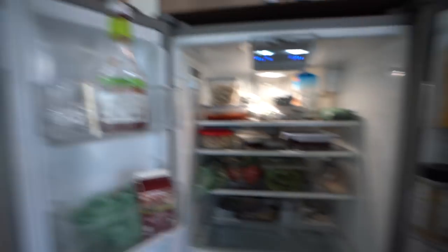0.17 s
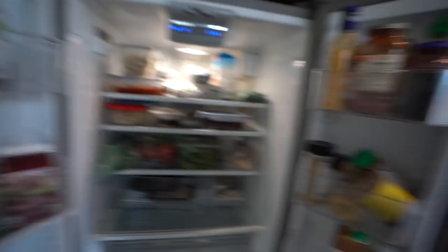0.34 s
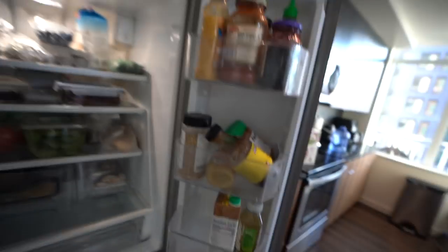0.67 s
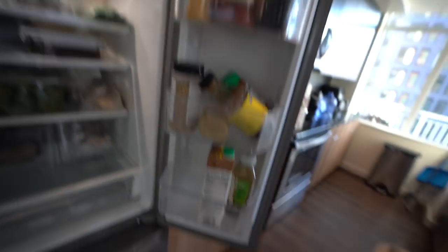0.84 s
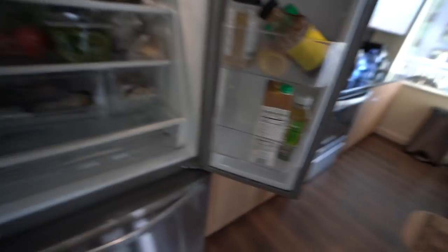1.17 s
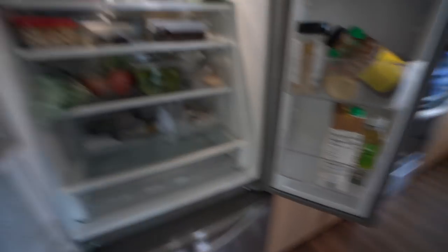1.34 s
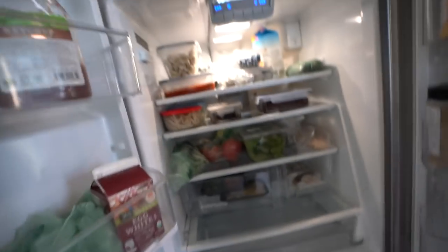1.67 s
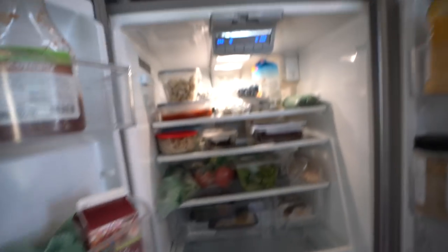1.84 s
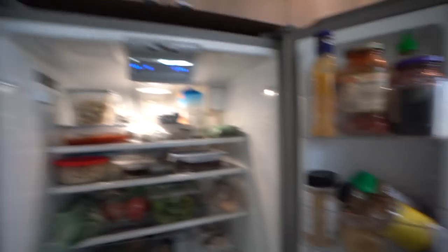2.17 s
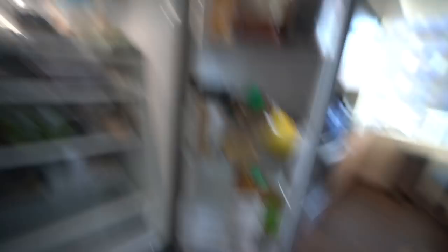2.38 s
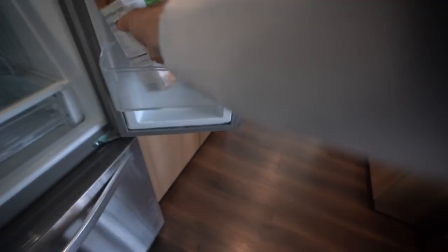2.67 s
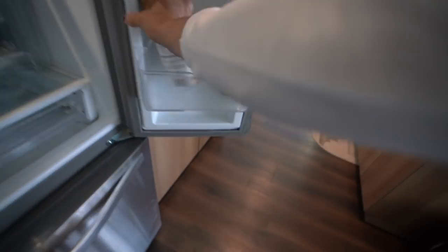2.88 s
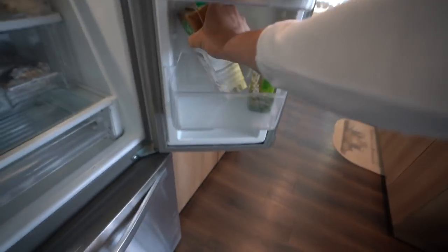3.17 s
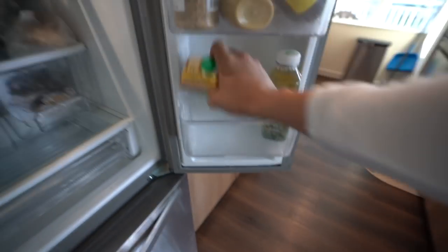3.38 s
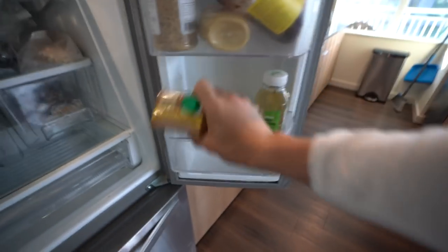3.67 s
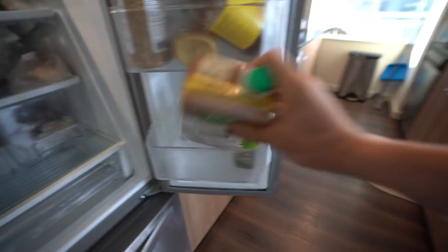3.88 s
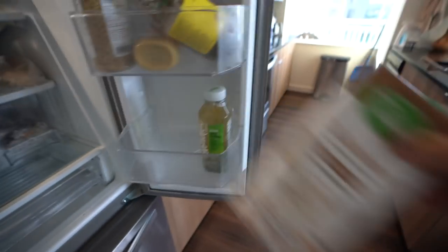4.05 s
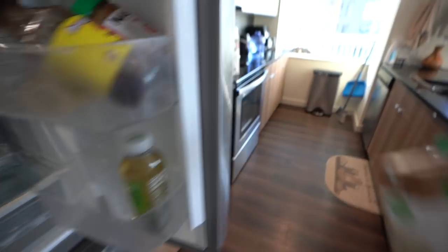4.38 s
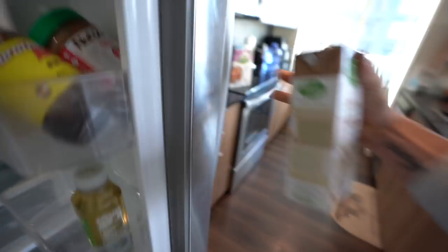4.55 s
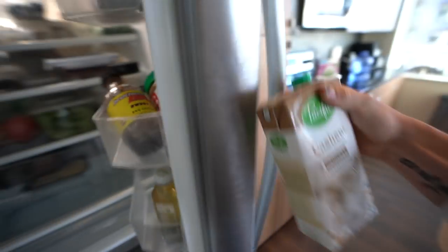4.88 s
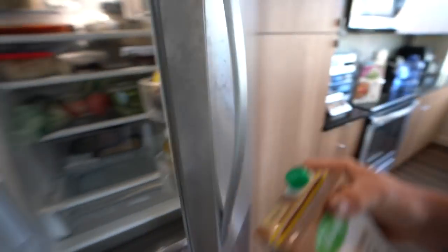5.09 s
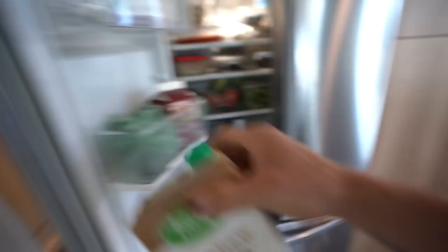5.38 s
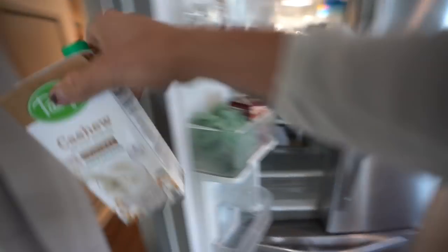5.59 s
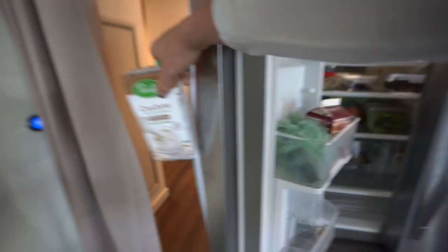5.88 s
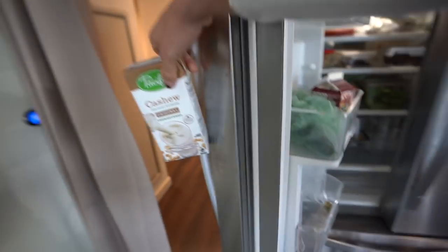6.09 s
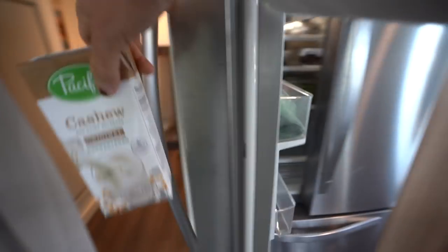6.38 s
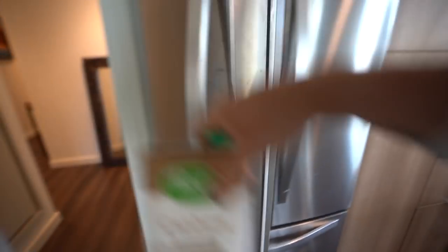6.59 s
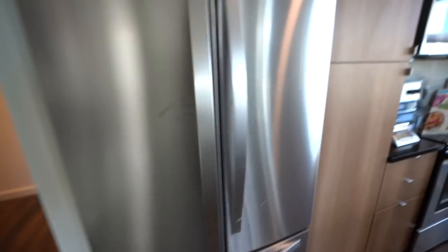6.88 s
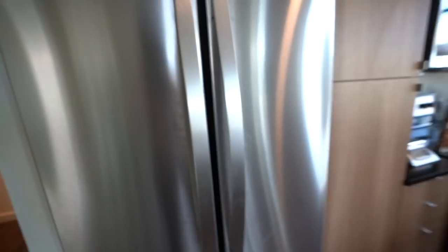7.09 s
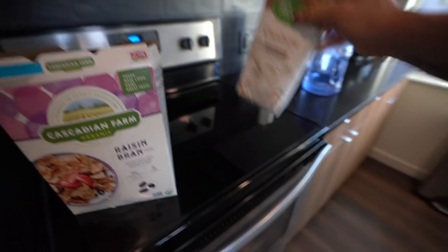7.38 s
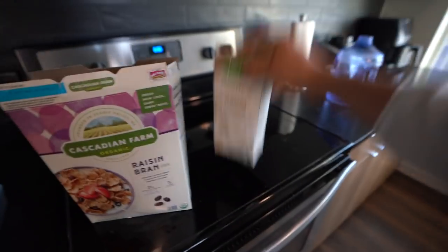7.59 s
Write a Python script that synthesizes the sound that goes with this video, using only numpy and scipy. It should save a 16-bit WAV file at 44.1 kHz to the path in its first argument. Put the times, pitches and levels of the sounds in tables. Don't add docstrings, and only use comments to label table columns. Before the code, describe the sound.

For the first 2.4 seconds an open refrigerator hums low with fan air, motor drone and faint high whines, with only slight slides and soft air thumps. From 2.5 to 4.2 a carton is dragged out of the plastic door bin: hard hollow raps, dull container bumps, stuttering rumble, scrapes and crinkly rustles, with a sharp snap near 3.4. A calmer gap has light taps around 4.6. At 4.8 to 5.0 bottles clink brightly in quick succession; at 5.2 a shelf rings. The loudest slam hits at 5.43, a deep clipped boom with rattling glass, ducking what follows. Bumps and scrapes continue to 6.4, then a lull. Door knocks return at 7.0 to 7.2, with a hard snap at 7.4. At 7.44 it cuts abruptly to a quieter counter, where the carton taps down lightly at 7.6. Close microphone, small kitchen echo.

```python
import sys
import numpy as np
from scipy import signal
from scipy.fft import rfft, irfft, next_fast_len
from scipy.io import wavfile

SR = 44100
rng = np.random.default_rng(int(sys.argv[2]) if len(sys.argv) > 2 else 0)


def master_out(mix):
    frames = np.transpose(np.atleast_2d(mix))
    ceiling = np.clip(frames, -1, 1)
    pcm = np.round(ceiling * 32767).astype(np.int16)
    wavfile.write(sys.argv[1], SR, pcm)


def invert_db(level):
    return 10 ** (np.asarray(level, dtype=float) / 20)


N = 340893
TIME_S = np.arange(N) / SR
SCENE_CUT_S = 7.435


def rms_one(x):
    return x / np.sqrt(np.mean(x ** 2) + 1e-20)


def in_time(rows):
    s, *columns = np.transpose(rows)
    return [np.interp(TIME_S, s, column) for column in columns]


def drift(rate_hz):
    r = np.exp(-80 * np.pi * rate_hz / SR)
    slow = signal.lfilter([1], [1, -2 * r, r * r], rng.standard_normal(N // 40 + 2002))[2000:]
    return np.interp(np.arange(N) / 40, np.arange(len(slow)), rms_one(slow))


def colour(x, spectrum):
    hz, db = np.transpose(spectrum)
    size = next_fast_len(N)
    bins_hz = np.maximum(np.arange(size // 2 + 1) * SR / size, 1)
    gain = invert_db(np.interp(np.log(bins_hz), np.log(hz), db))
    return rms_one(irfft(rfft(x, size) * gain, size)[:N])


def bandpass(low_hz, high_hz, order=2):
    return signal.butter(order, [low_hz, high_hz], "band", fs=SR, output="sos")


def ring(clicks, hz, t60):
    r = invert_db(-60 / (max(t60, .003) * SR))
    w = 2 * np.pi * hz / SR
    return signal.lfilter([0, np.sin(w)], [1, -2 * r * np.cos(w), r * r], clicks + 1e-18)


def grains(per_s, spread_db, clump_db, smooth, grit=1):
    sizes = invert_db(spread_db * np.minimum(rng.exponential(1, N), 4)) * rng.choice([-1, 1], N)
    slips = rms_one(sizes * (rng.random(N) < per_s / SR))
    mix = grit * slips + smooth * rng.standard_normal(N)
    mix = mix / np.sqrt(grit ** 2 + smooth ** 2)
    return invert_db(clump_db * grit * drift(28)) * mix


def strike(hits, modes, scatter_db):
    s, db = np.transpose(hits)
    chance, out = rng.standard_normal((len(hits), len(modes))), np.zeros(N)
    for (hz, level_db, t60), luck in zip(modes, chance.T):
        clicks = np.zeros(N)
        clicks[(s * SR).astype(int)] = invert_db(db + level_db + scatter_db * luck)
        out += ring(clicks, hz, t60)
    return out


def strokes(rows, rise_s, rise_share, fall_db_per_s):
    t = np.arange(0, N + 40, 40) / SR
    s, length, db, above_db = np.transpose(rows)[:, :, None]
    rise = rise_s + rise_share * length
    rise_db = -19 * np.maximum(s + rise - t, 0) / rise
    fall_db = -fall_db_per_s * np.maximum(t - s - length, 0)
    power = invert_db(2 * (db + rise_db + fall_db)) * ((t < SCENE_CUT_S) | (s > SCENE_CUT_S))
    layers = power, power * invert_db(2 * above_db)
    return np.array([np.interp(TIME_S, t, p.sum(axis=0)) for p in layers])


def swings(rows, rise_s):
    out, t = np.zeros(N + SR), np.arange(SR) / SR
    for s, db, hz, t60 in rows:
        i = int(s * SR)
        out[i:i + SR] += invert_db(db - 60 * t / t60) * (1 - np.exp(-t / rise_s)) * np.sin(2 * np.pi * hz * t)
    return out[:N]


# time_s, air_db, hum_db
FRIDGE_LEVELS = [(0, -27.5, -32), (1, -28, -30.5), (2.5, -23.5, -28), (4.5, -29, -32), (5, -26.5, -40.5),
                 (6.4, -24, -23), (6.9, -31, -81), (7.43, -30, -51), (7.44, -36, -66), (7.73, -31, -50)]
# freq_hz, density_db
FAN_AIR = [(12, -38), (20, -18), (86, 3.5), (154, -7.5), (193, 0.5), (222, -4), (293, -7), (446, -10),
           (642, -11.5), (825, -19), (1060, -21), (1150, -22.5), (1760, -29.5), (1960, -30), (16000, -66)]
# pitch_hz, level_db
WHINE_TONES = [(1126, -48), (1282, -52.5)]
# time_s, level_db
WHINE_LEVEL = [(0, 1.5), (2.2, 2), (2.6, 1), (4.6, -17), (7.73, -30)]


def fridge():
    hum_hz, hum_width_hz = 194.3, 5.7
    air_db, hum_db = in_time(FRIDGE_LEVELS)
    air = colour(rng.standard_normal(N), FAN_AIR) * invert_db(air_db + 0.13 * drift(2.9))
    steady = np.sqrt(2) * np.sin(2 * np.pi * hum_hz * TIME_S)
    waver = rms_one(ring(rng.standard_normal(N), hum_hz, 2.2 / hum_width_hz))
    whine = np.zeros(N)
    for hz, db in WHINE_TONES:
        whine += invert_db(db + 2.0 * drift(14)) * np.sqrt(2) * np.sin(2 * np.pi * hz * TIME_S)
    return air + invert_db(hum_db) * (steady + 0.45 * waver) + invert_db(in_time(WHINE_LEVEL)[0]) * whine


# start_s, length_s, scrape_db, rustle_above_scrape_db
SLIDE_STROKES = [(.1, 0.18, -42.5, -4), (1.5, 0.095, -50, 4.5), (1.3, 0.89, -58.5, 9.5),
                 (2.38, 0.35, -45, 16.5), (2.5, 0.075, -30, 6), (2.69, 0.04, -14.5, -11),
                 (2.75, 0.3, -22.5, -7), (3.09, 0.059, -28.5, 3.5), (3.16, 0.18, -20.5, -16),
                 (3.68, 0.16, -15.5, -12.5), (3.76, 0.2, -10.5, -9.5), (4.28, .18, -30, -20),
                 (4.86, 0.14, -18, -4), (.38, .1, -47.5, 0), (5.58, 0.2, -22.5, -20)]


def slides():
    return strokes(SLIDE_STROKES, rise_s=0, rise_share=0.71, fall_db_per_s=320)


# start_s, length_s, rumble_db, drag_above_rumble_db
SHOVE_STROKES = [(2.53, 0.014, -22, -10), (2.597, 0.028, -5.5, -11.5), (2.65, 0.4, -11.5, -8),
                 (3.107, 0.017, -9.5, -29), (3.14, 0.3, -10, -7), (3.55, 0.1, -19.5, -8),
                 (3.77, 0.014, -10, -4.5), (3.845, 0.24, -14.5, -29), (4.012, 0.0099, -13, -7),
                 (4.05, 0.1, -19, -1.5), (4.33, 0.022, -31.5, 2), (4.64, 0.023, -29, -3.5),
                 (4.765, .015, -26, -4), (4.783, 0.013, -9.5, -5.5), (4.83, 0.16, -26.5, 11.5),
                 (5.03, 0.044, -20.5, -24), (5.185, 0.057, -9.5, -6.5), (5.365, 0.022, -30.5, 10.5),
                 (5.425, 0.045, 5.5, -8), (5.47, 0.23, -13.5, -3), (5.65, 0.13, -13, -5.5),
                 (5.85, 0.15, -19, -7.5), (6.015, 0.052, -12.5, -2), (6.1, 0.24, -13, -8.5),
                 (7.003, 0.039, -15.5, 0), (7.06, 0.04, -15, -3), (7.12, 0.048, -13, -1.5),
                 (7.24, 0.12, -25.5, -3.5), (7.395, 0.018, -21.5, 0), (7.61, 0.025, -37, 1)]


def shoves():
    return strokes(SHOVE_STROKES, rise_s=0.0052, rise_share=0, fall_db_per_s=120.5)


# start_s, length_s, scrape_db, rustle_above_scrape_db
SCUFF_STROKES = [(2.62, 0.041, -50, 8), (2.757, 0.013, -38, -29), (3.38, 0.086, -34, -0.5),
                 (3.53, 0.022, -26, -4.5), (4.05, 0.08, -33, -8), (4.2, 0.14, -38.5, -2),
                 (4.64, 0.11, -47, -1), (4.788, 0.11, -17.5, -23), (4.99, 0.21, -30.5, -11),
                 (5.19, 0.059, -17.5, -10), (5.365, 0.011, -21, -27), (5.425, 0.05, -1.5, -25),
                 (5.47, 0.21, -16.5, -5.5), (5.83, 0.13, -25, -20), (6.02, 0.32, -22, -16.5),
                 (7.0, .19, -20.5, -9.5), (7.437, 0.084, -34.5, 0.5), (7.61, 0.057, -30.5, -10.5)]


def scuffs():
    return strokes(SCUFF_STROKES, rise_s=0.0045, rise_share=0, fall_db_per_s=129)


# start_s, length_s, scrape_db, foil_above_scrape_db
CRINKLE_STROKES = [(2.64, 0.041, -29, 6), (2.752, 0.015, -31, 5), (2.873, 0.026, -18, -20),
                   (2.932, 0.03, -31, 3), (2.997, 0.027, -32.5, 4), (3.04, 0.016, -29, -10),
                   (3.126, 0.019, -31, 2), (3.153, .022, -35, 4), (3.255, .015, -25, -12),
                   (3.293, 0.046, -21, -15), (3.465, 0.01, -18, -21), (3.505, 0.018, -32, -9),
                   (3.686, 0.019, -15.5, -16), (3.82, 0.013, -28, -2), (3.9, 0.095, -17, -7),
                   (3.99, 0.037, -9.5, -27), (4.085, 0.048, -23, -21), (4.33, 0.027, -29.5, -13),
                   (4.41, 0.023, -32, -10), (4.535, .015, -44, 4), (4.68, 0.029, -42, -7),
                   (4.825, 0.018, -10, -16), (4.872, 0.016, -29, 8), (5.28, 0.01, -19, -22),
                   (5.372, 0.011, -12.5, -28), (5.457, 0.014, -7, 5.5), (5.55, 0.026, -9, -8),
                   (5.615, 0.012, -13, -2), (5.656, 0.0094, -24, -11), (5.685, 0.0088, -16, -6.5),
                   (5.705, 0.028, -20, -11.5), (5.77, 0.036, -16, -21), (5.89, 0.019, -16.5, -26),
                   (6.082, 0.02, -25, -13), (6.252, 0.02, -17.5, -14), (6.308, 0.013, -10, -24),
                   (6.328, 0.0097, -17, -15), (6.38, 0.0097, -37, -5), (7.147, 0.013, -18, -15),
                   (7.41, 0.034, -32, 4), (7.638, 0.0081, -18, -12)]


def crinkles():
    return strokes(CRINKLE_STROKES, rise_s=0.0015, rise_share=0, fall_db_per_s=1200)


# pitch_hz, level_db, t60_s
DOOR_MODES = [(137, -8.5, 0.09), (188.2, -9, 0.086), (228, -7, 0.11), (288.3, 1.5, 0.073), (317.2, 1, 0.09),
              (357, 3.5, 0.048), (389, -1, 0.11), (433, -1, 0.061), (530, -4, 0.042), (699, -8, 0.056)]
# time_s, level_db
BIG_PANEL_LEVEL = [(0, 1), (4.6, 1), (4.8, -10), (5.9, -0.5), (6.1, 4), (7.73, 3.5)]


def door_rumble():
    shake = grains(per_s=200, spread_db=3.0, clump_db=1, smooth=.5)
    panel = invert_db(in_time(BIG_PANEL_LEVEL)[0])
    out = np.zeros(N)
    for k, (hz, db, t60) in enumerate(DOOR_MODES):
        push = shake * panel if k < 3 else shake
        out += invert_db(db) * (-1) ** k * ring(push, hz, t60)
    return rms_one(out)


def chatter():
    slips = grains(per_s=350, spread_db=4, clump_db=2, smooth=0)
    dealt = rng.integers(0, 18, N)
    out = np.zeros(N)
    for k, hz in enumerate(np.geomspace(750, 4600, 18)):
        out += ring(slips * (dealt == k), hz, t60=45 / hz)
    return rms_one(out)


# freq_hz, density_db
DRAG_COLOUR = [(290, -7.5), (500, 1), (613, -1.5), (708, 0), (1080, 1.5), (2000, -12.5), (2600, -29),
               (4400, -120)]
# freq_hz, density_db
SCRAPE_COLOUR = [(880, -28), (1500, -1), (1850, -3), (2540, -1.5), (2730, -4), (4090, -10.5), (5200, -24.5),
                 (6760, -22), (11400, -120)]
# freq_hz, density_db
RUSTLE_COLOUR = [(2350, 4), (4000, 4.5), (5220, -5.5), (7910, -7.5), (15000, -24.5), (16200, -27),
                 (16500, -80)]
# freq_hz, density_db
FOIL_COLOUR = [(2500, -16), (4500, -8), (6500, -7), (9000, -7), (13000, -7), (15800, -10), (16500, -60)]


def handling():
    rest_db = np.array([[-34.5], [-42], [-68], [-52]])
    idle = invert_db(2 * (rest_db - 4.5 * (TIME_S > SCENE_CUT_S)))
    idle[3] *= invert_db(2 * -4 * (TIME_S > 5.5))
    rubbing = scuffs() + slides()
    crumpled, foiled = crinkles()
    rubbing[0] += crumpled
    shaken, dragged, scraped, rustled = np.sqrt(idle + np.vstack([shoves(), rubbing]))

    grit = np.clip(dragged / invert_db(-24.5), 0, 1)
    slips = grains(per_s=1200, spread_db=3.5, clump_db=1.5, smooth=.8, grit=grit)
    drag = invert_db(-2.0) * dragged * colour(slips, DRAG_COLOUR)
    scrape = invert_db(-10.0) * scraped * colour(slips, SCRAPE_COLOUR)
    rustle = invert_db(-1.5) * rustled * colour(slips + 0.74 * rng.standard_normal(N), RUSTLE_COLOUR)
    foil = invert_db(-11.0) * np.sqrt(foiled) * colour(slips + 0.79 * rng.standard_normal(N), FOIL_COLOUR)
    loose = invert_db(-13) * np.hypot(scraped, dragged) * chatter()
    return shaken * door_rumble() + drag + scrape + rustle + foil + loose


# start_s, peak_db, pitch_hz, t60_s
THUMP_SWINGS = [(.15, -16, 54, .34), (.97, -18, 46, 0.62), (3.42, -10.5, 93, 0.43), (4.001, -26, 133, 0.41),
                (4.021, -8.5, 172, 0.69), (4.339, -7.5, 41.7, 0.45), (4.845, -16, 96, 0.35),
                (5.431, 22, 70, 0.13), (5.449, 3.5, 67.8, 0.71), (6.031, -21, 66, 0.8),
                (6.291, -18, 63.6, 0.19), (7.061, -12.5, 74.4, 0.28), (7.111, -5.5, 32.1, 0.24)]


def thumps():
    return swings(THUMP_SWINGS, rise_s=0.003)


# start_s, peak_db, centre_hz
TICK_EVENTS = [(2.465, -32, 3100), (2.7337, -26, 6200), (2.8259, -24, 5230), (2.843, -28, 8000),
               (3.258, -32, 12000), (3.404, -27, 11000), (3.558, -29, 7550), (3.632, -36, 13000),
               (3.672, -34, 9300), (3.7543, -28, 8000), (3.789, -24, 11000), (3.8276, -22, 11000),
               (4.069, -43, 13000), (4.085, -35, 9000), (4.115, -26, 7500), (4.13, -35, 8500),
               (4.136, -36, 10000), (4.155, -36, 7560), (4.2535, -32, 8000), (4.3578, -31, 3100),
               (4.3933, -36, 3100), (4.4796, -31, 8940), (4.6148, -33, 3060), (4.6318, -36, 8100),
               (4.6437, -32, 6000), (4.7694, -35, 5000), (6.013, -19, 3920), (6.5404, -43, 6540),
               (6.5813, -41, 6000), (6.612, -31, 5040), (7.4246, -27, 10100), (7.574, -31, 4300),
               (7.6604, -31, 9500)]
# start_s, peak_db, ring_hz
TAP_EVENTS = [
    (4.636, -17.5, 875),
    (4.697, -15, 954),
    (4.994, -1, 734),
    (5.37, -3.5, 990),
    (6.737, -18, 880),
    (7.613, -13.5, 740),
]


def ticks():
    out, size = np.zeros(N + SR), SR // 16
    events = TICK_EVENTS + TAP_EVENTS
    fade = np.exp(-np.arange(size) / SR * 1000 / 3.9)
    noise = rng.standard_normal((len(events), size)) * fade
    for (s, db, hz), puff in zip(events, noise):
        if hz > 3000:
            snap = signal.sosfilt(bandpass(hz * .8, hz * 1.3), puff)
        else:
            snap = ring(puff, hz, 0.028) + 0.6 * ring(puff, hz * 1.45, 0.018)
        i = int(s * SR)
        out[i:i + size] += invert_db(db) * snap / np.abs(snap).max()
    return out[:N]


# start_s, peak_db, ring_hz, brightness_db, contact_ms
CARTON_RAPS = [(2.5411, -3, 630, -8, 1.05), (2.6006, 8, 643, -17.5, 2.2), (2.6808, -0.5, 985, -12.5, 4.9),
               (2.77, -1.5, 910, -25, 3.7), (2.9688, -7, 750, -26, 2.1), (3, -23, 1500, 0, 5.1),
               (3.023, -12, 690, -22, 2.9), (3.1452, -10.5, 686, -20, 2.1), (3.2313, -4, 870, -24, 3.3),
               (3.311, -25, 765, -17, 5.5), (3.365, 0.5, 1020, -32, 3.4), (3.5436, -11, 2180, -13, 5.6),
               (3.588, -10.5, 1430, -34, 1), (3.775, -2, 750, -22, 2.6), (3.978, -5, 1790, -31, 1.1),
               (4.125, -21, 830, -22, 0.9), (4.679, -16, 910, -6.5, 4.4)]
# start_s, peak_db, ring_hz, brightness_db, contact_ms
SLAM_RAPS = [(4.7886, 0.5, 745, -53, 1.05), (4.8226, 0, 1090, -21, 1.1), (4.888, 9, 4100, -25, 1.1),
             (4.9149, 0, 4120, -28, 1.2), (4.949, -1, 2460, -21, 1.6), (5.188, 5, 1226, -21, 7.5),
             (5.37, -7, 1130, -57, 2.5), (5.427, 18.5, 3510, -14, 4.7), (5.464, 5, 2460, -9, 3.8),
             (5.495, 11, 684, -9, 6.8), (5.5537, -1, 1730, -21, 13), (5.6172, -2, 1500, -29, 8),
             (5.889, -10.5, 1180, -28.5, 9.1), (6.0224, -1, 1970, -25, 3.2), (6.166, -7, 960, -17, 4),
             (7.0149, 1.5, 1913, -22, 4.4), (7.1027, -4, 1090, -10, 1.8), (7.4033, 2.5, 836, -5, 0.23),
             (7.614, -16.5, 724, -36, 3.8), (7.6426, -18.5, 746, -21, 4.4), (7.72, -23.5, 1400, -25, 7.3)]
# start_s, edge_db, thud_db
CONTAINER_BUMPS = [(2.602, -40, 7.5), (2.773, -40, -1), (2.9205, -25, 10.5), (2.969, -40, 8.5),
                   (3.0463, -28, -5), (3.1244, -27, -3), (3.1723, -11, 13), (3.215, -15, -2),
                   (3.303, -31, -14), (3.3634, -38, 9), (3.4414, -14, 14), (3.6842, -12.5, 2.5),
                   (4.021, -13, 9), (4.094, -28, -15), (4.779, -22, -1), (5.464, -40, -2),
                   (5.4962, -42, 17.5), (5.5375, -20, -3), (5.6165, -40, 11.5), (5.9651, -14.5, 3),
                   (6.0766, -27, 1.5), (6.265, -7, 6), (6.3114, -15.5, 2), (6.8663, -38, -8),
                   (7.0033, -13, -19), (7.1505, -16, 3), (2.707, -30, 10), (2.848, -25, -10),
                   (2.886, -30, -5), (2.999, -30, 1), (3.11, -32, 13.5), (3.144, -32, 6), (3.24, -16, -6),
                   (3.254, -14, 13.5), (3.509, -26, 3), (3.584, -19, 2.5), (3.611, -36, -1),
                   (3.773, -32, 4), (3.852, -10, -13), (3.949, -20, 0), (3.977, -20, 3), (4.055, -32, -3),
                   (4.147, -36, -7), (4.202, -34, -2.5), (4.787, -33, -0.5), (5.066, -25, -6),
                   (5.589, -22, 1), (5.643, -22, -3), (5.798, -27, -1.5), (6.167, -33, 1),
                   (6.334, -15, -12), (7.127, -26, 6), (7.177, -29, -9), (7.2, -33, -2), (7.223, -29, -0.5)]


def knocks():
    out, size = np.zeros(N + SR), SR // 8
    t = np.arange(size) / SR
    blows = [(*rap, rap[1] - 47) for rap in CARTON_RAPS + SLAM_RAPS]
    blows += [(s, edge_db, 845, -25, 2.6, thud_db) for s, edge_db, thud_db in CONTAINER_BUMPS]
    noise = rng.standard_normal((len(blows), 2, size))
    treble, middle = bandpass(4800, 14000), bandpass(500, 4000, order=4)
    pushes = []
    for (s, db, hz, bright_db, ms, thud_db), (a, b) in zip(blows, noise):
        contact = np.exp(-t * 1000 / np.clip(ms, .3, 12))
        scuff = signal.sosfilt(middle, b * (contact + 0.55 * contact ** 0.54))
        crack = signal.sosfilt(treble, a * (contact + 0.057 * contact ** 0.84))
        panel = ring(a * np.exp(-t / 0.00035), hz, 0.016 + 0.0022 * ms + 1.5 / hz)
        sound = 0.79 * panel / np.abs(panel).max() + 0.99 * scuff / np.abs(scuff).max()
        sound += invert_db(bright_db - 1.0) * crack
        i = int((s + .0004) * SR)
        out[i:i + size] += invert_db(db + 2.5) * sound
        pushes.append((s + 0.001223, thud_db - 20.5))
    padding = signal.butter(2, 650, fs=SR, output="sos")
    return out[:N] - signal.sosfilt(padding, strike(pushes, DOOR_MODES, scatter_db=5.0))


# start_s, peak_db
SNAP_EVENTS = [
    (2.7337, -20),
    (2.92, -22),
    (3.1755, -12),
    (3.3645, -7),
    (4.2545, -26),
    (4.6445, -21),
    (5.4965, -4),
    (7.404, -4.5),
]


def snaps():
    out, size = np.zeros(N + SR), SR // 50
    noise = rng.standard_normal((len(SNAP_EVENTS), size)) * np.exp(-np.arange(size) / SR / .0008)
    bursts = signal.sosfilt(bandpass(1100, 8000), noise)
    for (s, db), snap in zip(SNAP_EVENTS, bursts):
        i = int(s * SR)
        out[i:i + size] += invert_db(db) * snap / np.abs(snap).max()
    return out[:N]


# start_s, peak_db, pitch_hz, t60_s
PING_SWINGS = [(4.7050, -32, 5500, .02), (4.8235, -19, 6450, .08), (4.8235, -24, 6105, .08),
               (4.95, -27, 5540, .15), (5.002, -28, 2082, .15), (4.8235, -15, 4200, 0.084),
               (4.8235, -9, 2000, 0.092), (5.23, -38, 7200, .2), (6.0135, -3, 1250, .035),
               (5.965, -11, 980, .025), (2.92, -7, 2260, .025), (3.049, -6, 1190, 0.032),
               (5.441, -10, 3700, .04), (5.458, -14, 8100, .07), (5.706, -26, 5650, .08),
               (5.861, -24, 4300, .05), (5.712, -28, 6498, .12), (5.3, -31, 4300, .05),
               (4.461, -32, 4120, .04)]


def pings():
    return swings(PING_SWINGS, rise_s=0.00041)


# start_s, length_s, high_ring_db, low_above_high_db
JINGLE_STROKES = [
    (3.89, .07, -29.5, 7.5),
    (4.95, 0.13, -39, -6),
    (5.55, 0.095, -27, -4),
    (5.68, 0.14, -34, -6),
]


def jingle():
    touches = grains(per_s=600, spread_db=4, clump_db=2, smooth=.5)
    high, low = np.sqrt(strokes(JINGLE_STROKES, rise_s=0.013, rise_share=0, fall_db_per_s=200.0))
    high_glass = rms_one(sum(ring(touches, hz, .035) for hz in (3880, 4120, 3900)))
    low_glass = rms_one(sum(ring(touches, hz, .035) for hz in (2140, 2200, 2400)))
    return high * high_glass + low * low_glass


# start_s, strength_db, free_ring_s before the next contact, loss_db_per_octave off the main ring
CLINK_EVENTS = [
    (4.8225, -22, .04, -3),
    (4.8868, -3, .022, 0),
    (4.9148, -4, .03, 0),
    (4.9487, -5, .03, -1),
    (4.972, -20, .02, -3),
    (5.002, -12, .092, 12),
    (5.098, -22, .07, 20),
    (5.459, 4, .043, 30),
    (5.552, -13, .06, 30),
    (5.712, -17, .033, 30),
]
# pitch_hz, level_db, t60_s
GLASS_MODES = [(2078, -12, .2), (2293, -8, .25), (2487, -11, .15), (2573, -3, .45), (2596, -8, .25),
               (2640, -5, .05), (4070, 5, .022), (4151, -14, .15), (4170, 5, .025), (4296, -16, .25),
               (4393, -16, .15), (5626, -25, .15), (6072, -25, .2), (6471, -22, .25), (6573, -19, .055),
               (6745, -24, .2), (8100, -24, .06), (9518, -31, .15)]


def bottles():
    out, t = np.zeros(N + SR), np.arange(SR // 2) / SR
    hz, level_db, t60 = np.transpose(GLASS_MODES)[:, :, None]
    octaves_off = np.abs(np.log2(hz / hz[3]))
    luck = rng.standard_normal((len(CLINK_EVENTS), len(GLASS_MODES), 1))
    for (s, db, free_s, loss_db), chance in zip(CLINK_EVENTS, luck):
        mode_db = db + level_db - loss_db * octaves_off + 2 * chance - 60 * t / t60
        modes = invert_db(mode_db) * np.sin(2 * np.pi * hz * t)
        choke = np.exp(-np.maximum(t - free_s, 0) / 0.0018)
        i = int(s * SR)
        out[i:i + len(t)] += modes.sum(axis=0) * (.08 + .92 * choke) * (1 - np.exp(-t / .0005))
    return out[:N]


# start_s, level_db
SHELF_HITS = [
    (5.1887, -3.5),
    (5.214, -15),
    (5.232, -12),
    (5.28, -26),
]
# pitch_hz, level_db, t60_s
SHELF_MODES = [(1141, 1, .08), (1230, 0, .06), (1879, -9, .12), (2750, -2, .02), (3499, -8, .18),
               (3671, -15, .16), (4253, -20, .1)]


def shelf():
    return strike(SHELF_HITS, SHELF_MODES, scatter_db=1)


def kitchen(x):
    t = np.arange(SR // 2) / SR
    echo = rng.standard_normal(len(t)) * invert_db(-60 * t / 0.39) * (t > .006)
    echo = signal.sosfilt(signal.butter(1, 12500, fs=SR, output="sos"), echo)
    return signal.fftconvolve(x, echo / np.sqrt(np.sum(echo ** 2)))[:N]


def scene():
    hits = knocks() + ticks() + bottles() + shelf() + pings()
    echoing = (TIME_S < SCENE_CUT_S) | (TIME_S > SCENE_CUT_S + .15)
    echoes = invert_db(-18) * kitchen(hits) * echoing
    return (fridge() + handling() + hits + echoes + thumps() + snaps() + jingle())[None]


def roll_off(x):
    return signal.sosfilt(signal.butter(12, 17020, fs=SR, output="sos"), x)


def record(dry):
    limit_db, release_db_per_s, ceiling = 2.5, 107, 1.45
    over_db = np.maximum(20 * np.log10(np.abs(dry) + 1e-9) - limit_db, 0)
    hiss_db = -61 - 3 * (TIME_S > 5.45)
    hiss = invert_db(hiss_db) * np.diff(rng.standard_normal(N + 1))
    ramp_db = release_db_per_s * TIME_S
    held_db = np.maximum.accumulate(over_db + ramp_db, axis=1) - ramp_db
    duck_db = signal.lfilter([.03], [1, .03 - 1], held_db)
    ducked = (dry + hiss) * invert_db(-duck_db)
    rounded = ceiling * np.tanh(ducked / ceiling)
    rounded = signal.sosfilt(signal.butter(1, 14, "high", fs=SR, output="sos"), rounded)
    top_cut = signal.cheby2(16, 45, 16000, fs=SR, output="sos")
    mix = signal.sosfilt(top_cut, np.clip(rounded, -.97, .97))
    return roll_off(mix)


dry = scene()
out = record(dry)
master_out(out)
```